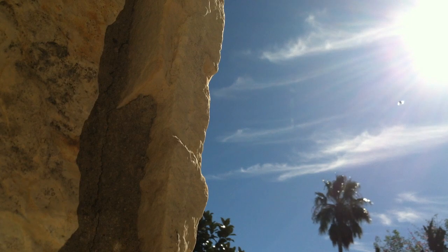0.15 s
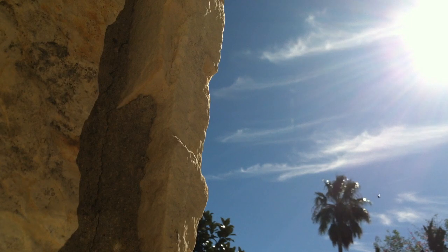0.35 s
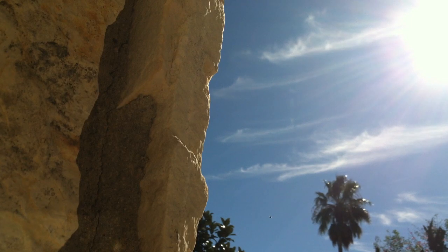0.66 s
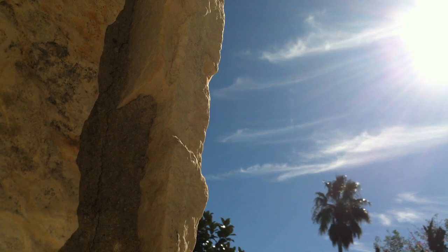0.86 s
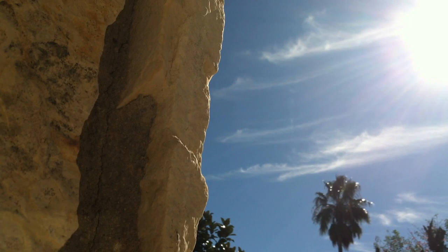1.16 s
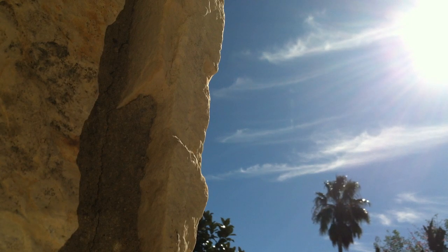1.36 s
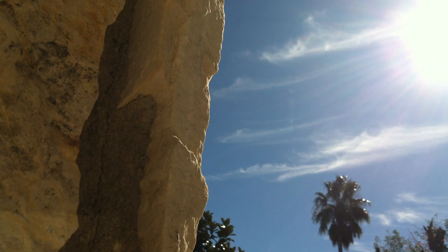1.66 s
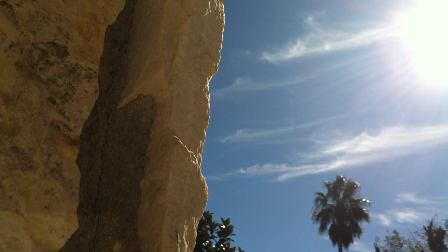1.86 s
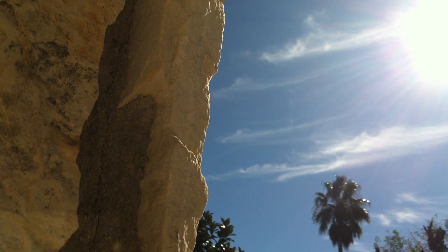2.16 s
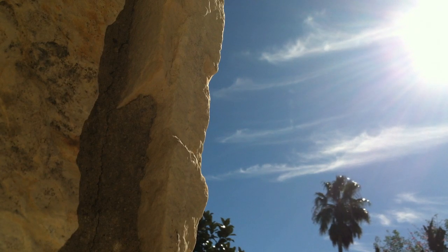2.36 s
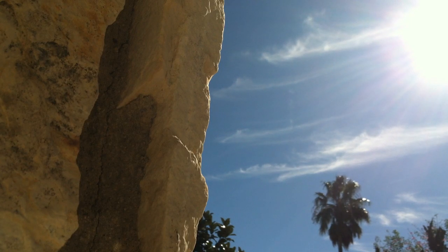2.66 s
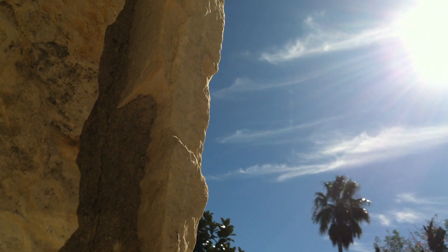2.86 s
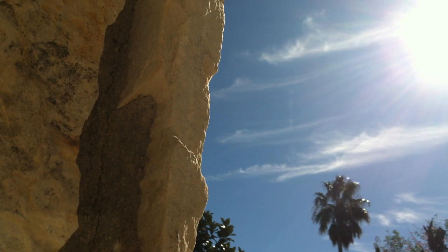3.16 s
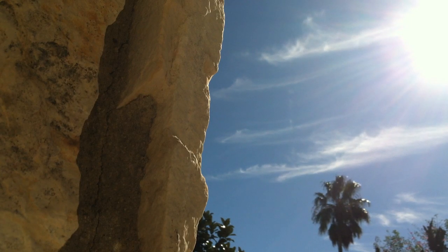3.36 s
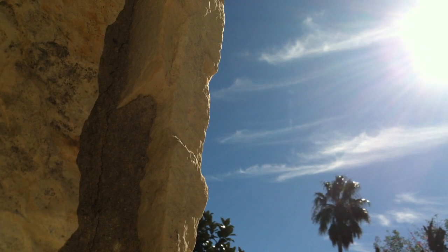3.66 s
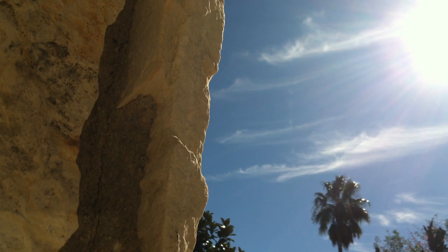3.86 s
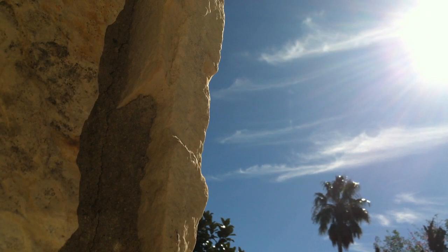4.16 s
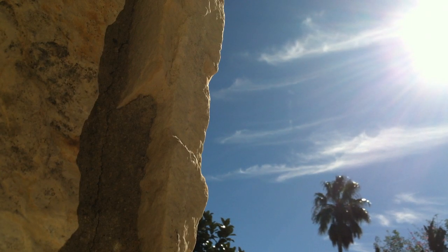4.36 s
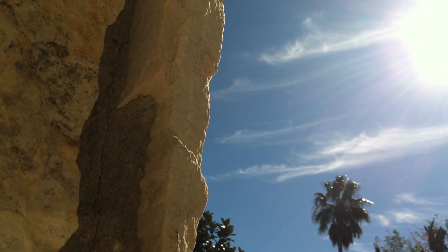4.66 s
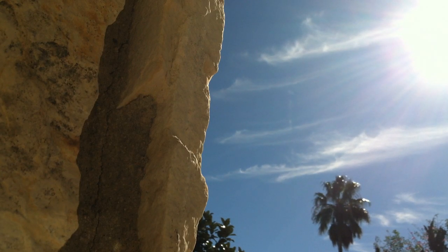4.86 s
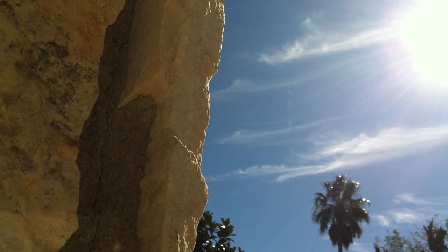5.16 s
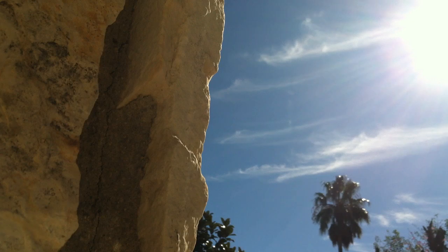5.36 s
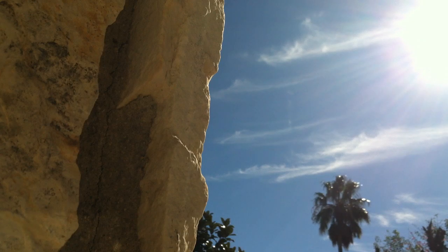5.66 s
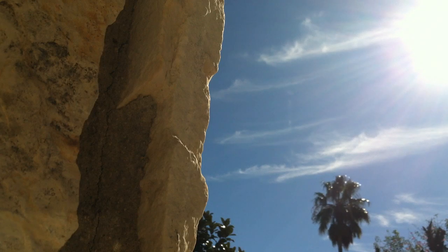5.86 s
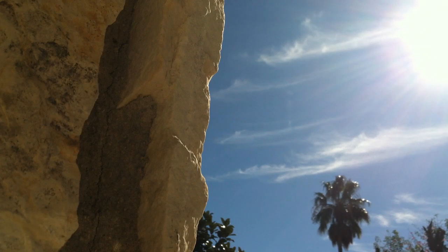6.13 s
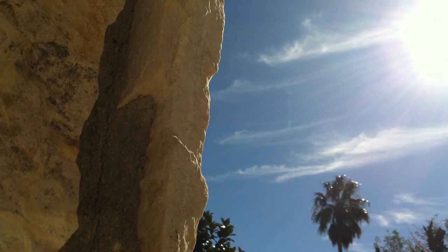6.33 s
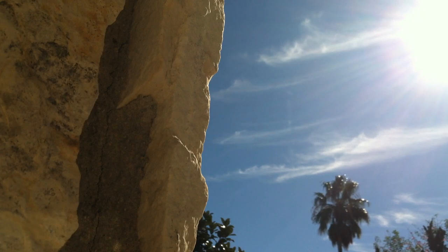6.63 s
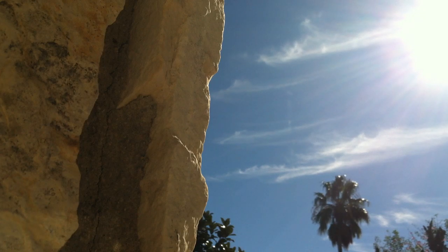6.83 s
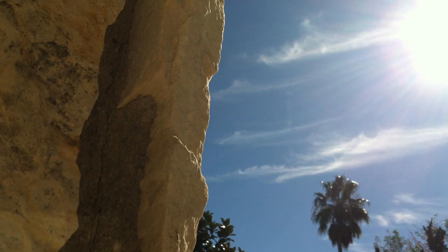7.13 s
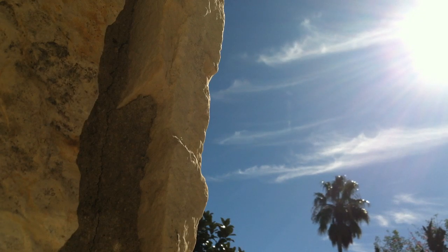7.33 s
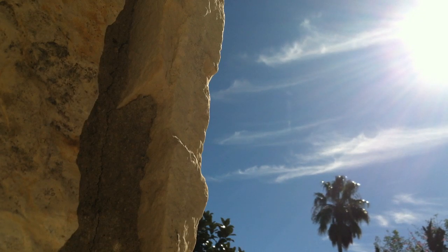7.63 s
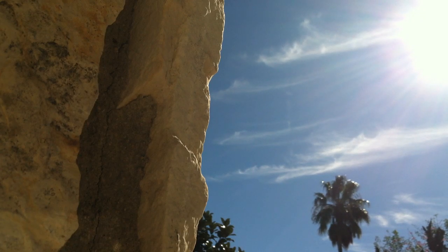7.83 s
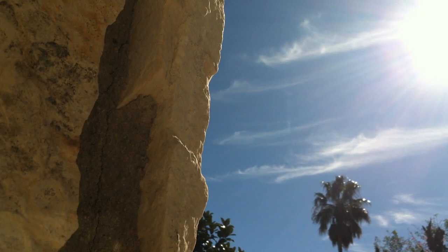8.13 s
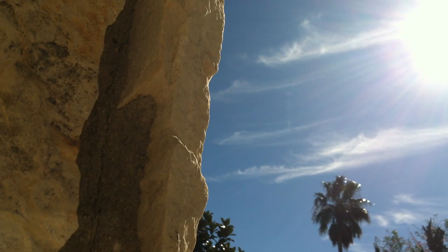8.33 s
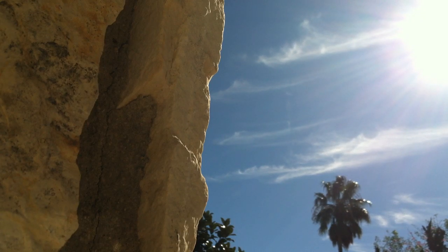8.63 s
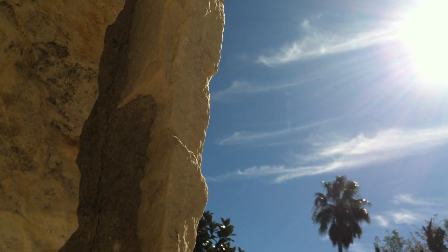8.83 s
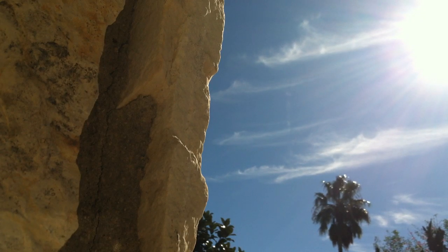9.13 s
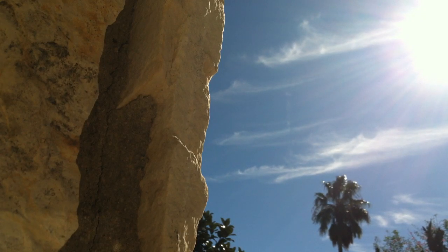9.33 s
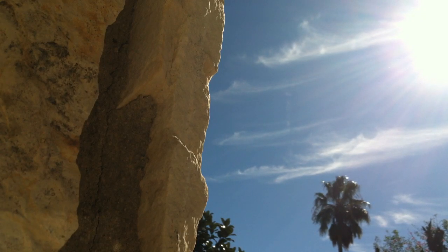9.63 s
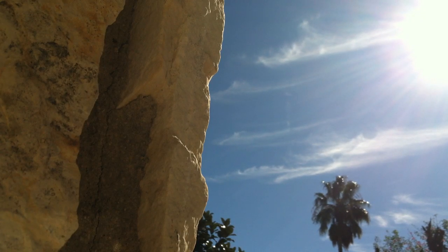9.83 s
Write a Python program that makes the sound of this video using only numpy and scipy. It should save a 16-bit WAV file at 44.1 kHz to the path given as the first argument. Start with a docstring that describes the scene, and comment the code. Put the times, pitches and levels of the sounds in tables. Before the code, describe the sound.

Steady rush of distant road traffic with low engine hum; a heavier vehicle drones past, sinking in pitch, then the roar thins.

```python
"""Distant road traffic heard from the foot of a rock wall, as swelling bands of noise over still air.
From the start a heavy vehicle drones past, a series of engine orders whose pitch sinks overall, among far engine
tones. A steady engine joins, exhausts boom as gliding tones, one swells loudly under load and a tread sings.
Later an engine drone wavers and soft rustles, fast-wandering sines, flick by; near the end one more engine
hums while a small bird chirps faintly in short sine notes with an echo."""
import sys
import numpy as np
from scipy import signal
from scipy.fft import rfft, irfft, next_fast_len
from scipy.io import wavfile
from scipy.ndimage import uniform_filter1d

SR = 44100
rng = np.random.default_rng(int(sys.argv[2]) if len(sys.argv) > 2 else 0)


def unload_wav(signal):
    """Save mono or channel-first audio to the path in sys.argv[1] as 16-bit WAV at rate SR, clipped to [-1, 1]."""
    wavfile.write(
        sys.argv[1],
        SR,
        np.round(np.clip(np.atleast_2d(signal).T, -1, 1) * 32767).astype(np.int16),
    )


N = 440559
TIME = np.arange(N) / SR  # s

# Exhaust rumble of the traffic. Each row: time in seconds, level in dB before the offset of each user.
EXHAUST_LEVEL = [(0, -37), (0.7, -35), (1.1, -33.5), (1.75, -33), (2.1, -33), (3.2, -33.5), (3.8, -33.5),
                 (4.25, -32.5), (5, -35.5), (6.4, -35.5), (6.9, -36.5), (7.75, -38.5), (8.75, -36),
                 (9.99, -39.5)]


def gain_of(db):
    """Level to amplitude: 20 dB is a factor of ten."""
    return 10 ** (np.asarray(db) / 20)


def evened(x):
    """Normalization: divides by the root mean square, so that equal gains mean equal power."""
    return x / np.sqrt(np.mean(x ** 2) + 1e-20)


def curves(rows):
    """Linear interpolation in time of every column after the first."""
    seconds, *columns = np.transpose(rows)
    return [np.interp(TIME, seconds, column) for column in columns]


def present(rows, fade=0.13):
    """Linear fades over `fade` seconds at the ends of a table; a source sounding from the start has no rise."""
    start, end = rows[0][0], rows[-1][0]
    rise = np.clip((TIME - start) / fade, 0, 1) if start > fade else 1
    return rise * np.clip((end - TIME) / fade, 0, 1)


def arch(middle, length):
    """Swell envelope: a half sine, raised to a power, that climbs from silence to 1 and sinks back."""
    phase = np.clip((TIME - middle) / length + .5, 0, 1)
    return np.sin(np.pi * phase) ** 0.79  # a power below 1 steepens the ends


def drift(rate_hz):
    """Low-passed random process: white noise under a Gaussian spectrum wanders slowly, with rms 1."""
    steps = TIME[::16]  # a coarse grid is enough for slow changes
    size = next_fast_len(len(steps))
    hz = np.fft.rfftfreq(size, steps[1])
    slow = irfft(rfft(rng.standard_normal(size)) * np.exp(-(hz / rate_hz) ** 2), size)
    return evened(np.interp(TIME, steps, slow[:len(steps)]))


def rush(spectrum, patchy_db):
    """Spectral shaping: noise of rms 1, broken into soft patches by the moving air on its way."""
    hz = np.fft.rfftfreq(4096, 1 / SR)
    real, imag, patches = rng.standard_normal((3, N // 1024 + 3, len(hz)))
    patches = uniform_filter1d(patches, size=8, axis=0)  # smooth in time
    patches = evened(uniform_filter1d(patches, size=36, axis=1))  # smooth in frequency
    corner_hz, corner_db = np.transpose(spectrum)
    colour_db = np.interp(np.log(hz + 1), np.log(corner_hz), corner_db)
    colour_db -= 40 * np.log10(np.maximum(hz / corner_hz[-1], 1))  # 12 dB per octave above the last row
    frames = (real + 1j * imag) * gain_of(colour_db + patchy_db * patches)
    return evened(signal.istft(frames.T, nperseg=4096, noverlap=3072)[1][:N])


def tone(hz, scatter, spread_hz):
    """Multipath interference: a direct sine plus randomly scattered paths that make it waver, with rms 1."""
    direct = np.exp(2j * np.pi * np.cumsum(hz) / SR)
    paths = 1 + scatter * (drift(spread_hz) + 1j * drift(spread_hz))
    return evened((direct * paths).real)


def still_air():
    """Background noise: a faint, steady broadband floor."""
    # Each row: frequency in Hz, relative density in dB per Hz.
    air_spectrum = [(30, -1.5), (3000, 4.5), (5500, 2.5), (7500, 0.5), (9000, -2), (11000, -7),
                    (14000, -13.5), (16000, -19)]
    return gain_of(-75.5) * rush(air_spectrum, patchy_db=.5)


def engine_drone():
    """Incoherent addition: many far engines and exhausts merge into low bands of noise."""
    # Deep engine noise and exhaust rumble. Each row: frequency in Hz, relative density in dB per Hz.
    deep_spectrum = [(20, -42.5), (33, -40.5), (50, -36), (65, -30.5), (82, -18.5), (100, -13.5), (120, -1),
                     (160, -0.5), (185, -7.5), (230, -28), (330, -52.5)]
    exhaust_spectrum = [(110, -52.5), (150, -13), (185, -2.5), (215, -1.5), (245, 2), (280, 0.5), (312, -3),
                        (340, -6), (400, -18), (700, -47.5)]
    # Deep engine noise. Each row: time in seconds, level in dB before a boost of 6 dB.
    deep_rows = [(0, -52), (1.6, -51), (2.8, -57), (3.8, -51), (4.5, -56), (5.1, -52), (6.5, -56),
                 (7.8, -58), (9.99, -54)]
    deep_db, = curves(deep_rows)
    exhaust_db, = curves(EXHAUST_LEVEL)
    deep = gain_of(deep_db + 6 + 1.1 * drift(2.8)) * rush(deep_spectrum, patchy_db=0.9)
    exhaust = gain_of(exhaust_db - 0.58 + 0.5 * drift(11)) * rush(exhaust_spectrum, patchy_db=-0.38)
    return deep + exhaust


def road_roar():
    """Band noise: bodies roar above the engines, tread noise centres near 900 Hz, thin treble lies on top."""
    # Body roar, tyre roar and thin treble. Each row: frequency in Hz, relative density in dB per Hz.
    body_spectrum = [(200, -39.5), (310, -3), (365, 0), (420, 1), (500, -3), (560, -4.5), (640, -8.5),
                     (780, -14.5), (1300, -48)]
    tyre_spectrum = [(400, -36), (580, -9.5), (700, -1), (840, 2.5), (1050, 1), (1280, -2), (1500, -10),
                     (2000, -24), (4000, -58)]
    treble_spectrum = [(3000, -19.5), (4000, -3.5), (4700, 1.5), (5500, -7), (7500, -13), (10000, -22.5),
                       (15000, -41)]
    # The same three. Each row: time in seconds, level in dB (before +2 dB for tyres, -3 dB for treble).
    body_rows = [(0.0, -36), (0.05, -38), (1.33, -39.5), (1.72, -34.5), (1.83, -37.5), (3.28, -36.5),
                 (6.57, -45), (6.93, -40.5), (7.18, -47.5), (7.2, -41), (7.29, -43.5), (9.99, -45.5)]
    tyre_rows = [(0.0, -44), (1.55, -42.5), (3.84, -44.5), (4.31, -43), (5.29, -46.5), (5.42, -44.5),
                 (6.34, -47), (6.37, -45), (7.48, -49.5), (8.15, -47), (9.85, -48.5), (9.99, -46)]
    treble_rows = [(0.05, -67), (1.91, -66.5), (2.9, -71), (4.36, -69.5), (7.35, -79), (9.9, -76.5)]
    body_db, tyre_db, treble_db = (curves(rows)[0] for rows in (body_rows, tyre_rows, treble_rows))
    body = gain_of(body_db) * rush(body_spectrum, patchy_db=1.0)
    tyres = gain_of(tyre_db + 2) * rush(tyre_spectrum, patchy_db=0.5)
    return body + tyres + gain_of(treble_db - 3) * rush(treble_spectrum, patchy_db=1.0)


def nearby(far_db, cars):
    """Inverse-square law: the power of each passing car falls with distance and adds to the far traffic."""
    power = gain_of(far_db) ** 2
    for closest, half, db in cars:
        power = power + gain_of(db) ** 2 / (1 + ((TIME - closest) / half) ** 2)
    return np.sqrt(power)


def tyre_hiss():
    """Air absorption: distance removes treble, so tyre hiss and sizzle follow the nearest cars."""
    # Hiss and the sizzle above it. Each row: frequency in Hz, relative density in dB per Hz.
    hiss_spectrum = [(800, -27), (1200, -6), (1450, 2), (1650, 0), (2000, -5.5), (2400, -9.5),
                     (2900, -19.5), (5000, -44.5)]
    sizzle_spectrum = [(1500, -28.5), (2200, -6), (2650, 2), (3200, -1.5), (4000, -7.5), (4700, -17.5),
                       (5400, -27.5), (7500, -38)]
    # Nearer cars. Each row: time when closest in seconds, time until half power in seconds,
    # hiss level in dB, sizzle level in dB.
    near_cars = [(0.3, 0.54, -49, -62.5), (1.2, 0.54, -46.3, -57.5), (2.0, 0.4, -60, -64),
                 (4.15, 0.68, -50, -60.5), (6.3, .4, -54, -70), (9.05, 0.48, -52, -63.5)]
    hiss_gain = nearby(-54.5, [(s, half, db) for s, half, db, _ in near_cars])
    sizzle_gain = nearby(-70.5, [(s, half, db) for s, half, _, db in near_cars])
    hiss = hiss_gain * rush(hiss_spectrum, patchy_db=1.0)
    sizzle = sizzle_gain * rush(sizzle_spectrum, patchy_db=1.6)
    return gain_of(0.18 * drift(2.7)) * (hiss + sizzle)


def passing_engine(fading_db=1.0, fading_hz=1.0):
    """Harmonic series: orders sink together; ground and wall echoes make each fade and surge on its own."""
    # Engine speed. Each row: time in seconds, cycle rate in Hz.
    speed_rows = [(0, 46.3), (0.8, 46.34), (1.2, 44.82), (2.5, 45.64), (3.8, 44.36), (4.55, 43.12),
                  (5.35, 42.77), (5.55, 41.08), (6.4, 40.48), (7.6, 39.33)]
    # Orders between surges. Each row: multiple of the cycle rate, level in dB.
    order_rows = [(2, -62), (3, -55.5), (4, -49.5), (5, -55), (6, -55.5), (7, -49.5)]
    # Surges, where echoes reinforce one order. Each row: middle in seconds, length in seconds,
    # multiple of the cycle rate, level in dB.
    surge_rows = [(0.025, 0.24, 4, -35), (0.34, 0.42, 4, -32), (0.76, 0.22, 4, -30), (0.95, 0.76, 2, -56),
                  (1.2, 0.42, 4, -38), (2.1, 0.86, 4, -38.5), (4.014, 0.6, 4, -36), (4.1, 0.8, 2, -59),
                  (4.418, 0.3, 4, -43), (4.6, 0.7, 3, -46), (5.2, 1.0, 3, -49.5), (5.3, 0.36, 4, -38),
                  (5.284, 0.38, 6, -42), (5.27, 0.56, 7, -36.5), (5.6, 0.52, 5, -37), (5.703, 0.3, 7, -35),
                  (5.748, 1.1, 2, -50.5), (5.88, 0.55, 4, -36), (5.87, 0.34, 6, -35),
                  (6.267, 0.23, 6, -37.5), (6.35, 0.69, 3, -44.5), (6.35, 0.28, 4, -43.5),
                  (6.35, 0.71, 5, -40.5), (6.524, 0.16, 7, -35.5), (6.672, 0.26, 4, -40.5),
                  (7.0, 0.5, 4, -48)]
    cycle_hz, = curves(speed_rows)
    out = np.zeros(N)
    for order, base_db in order_rows:
        surge = sum(gain_of(db) * arch(s, length) for s, length, k, db in surge_rows if k == order)
        level = np.hypot(gain_of(base_db + fading_db * drift(fading_hz)), surge)  # powers add
        out += level * tone(order * cycle_hz, scatter=0.024 * order, spread_hz=10)
    return out * present(speed_rows, fade=0.62)


def far_engines(level_db=-9, fading_db=5, count=5):
    """Frequency and amplitude modulation: a few tones wander in pitch and surface within the rumble."""
    exhaust_db, = curves(EXHAUST_LEVEL)
    out = np.zeros(N)
    for centre_hz in np.geomspace(215.7, 319.8, num=count):
        pitch = centre_hz * (1 + 0.045 * drift(.8))
        fading = gain_of(fading_db * np.tanh(drift(2.7)))  # tanh bounds the fading
        out += fading * np.sin(2 * np.pi * np.cumsum(pitch) / SR)
    return gain_of(exhaust_db + level_db) * evened(out)


def steady_engine(firing_hz=64.3, fading_db=1.5):
    """Half-order excitation: uneven cylinders add 1.5 times the firing rate to a constant hum that swells."""
    # Each row: multiple of the firing rate, middle in seconds, length in seconds, level in dB.
    swells = [(1, 3.6, 3.0, -66), (1.5, 1.85, 1.0, -54.5), (1.5, 2.9, 0.9, -53), (1.5, 4.1, 1.3, -58),
              (2, 2.5, 2.2, -50.5), (2, 3.58, 0.7, -46.5)]
    out = np.zeros(N)
    for order, middle, length, db in swells:
        hum = tone(np.full(N, order * firing_hz), scatter=0.086, spread_hz=4)
        out += gain_of(db + fading_db * drift(0.82)) * arch(middle, length) * hum
    return out


def exhaust_booms():
    """Gliding tones: a firing tone of another vehicle swells out of the rumble and sinks back."""
    # Each row: middle in seconds, length in seconds, pitch in Hz, glide in Hz per second, level in dB.
    boom_rows = [(1.752, 0.17, 254, 1.5, -32), (2.62, 0.33, 273.6, -30.5, -38.5),
                 (3.08, 0.3, 240.3, 19.5, -35), (3.379, 0.5, 192.6, -9.5, -41.5),
                 (3.6, 0.17, 236.3, -0.5, -33.5), (4.05, 0.39, 236.6, -1, -38),
                 (4.33, 0.4, 311.6, 0, -38.5), (4.605, 0.6, 263, -9.5, -38), (8.947, 0.77, 254.3, 0, -46),
                 (9.08, 0.65, 181, 0, -46)]
    out = np.zeros(N)
    for middle, length, hz, glide, db in boom_rows:
        pitch = hz + glide * np.clip(TIME - middle, -length, length)
        out += gain_of(db) * arch(middle, length) * tone(pitch, scatter=.13, spread_hz=12)
    return out


def throttled_engine(rows, scatter, spread_hz):
    """Firing frequency: one tone follows the throttle, and its scattered paths make it waver."""
    hz, db = curves(rows)
    return gain_of(db) * present(rows) * tone(hz, scatter, spread_hz)


def lone_engines():
    """Tonal prominence: three engines that enter in turn stand out of the rumble as single tones."""
    # The loudest exhaust, swelling twice under load; a far engine whose drone wavers;
    # a late vehicle easing off and picking up again.
    # Each row: time in seconds, firing tone in Hz, level in dB.
    loud_rows = [(3.1, 279, -43), (3.52, 277, -39), (3.6, 278, -30), (3.74, 279, -38), (3.9, 279.5, -35),
                 (3.97, 279.7, -27.5), (4.03, 280, -27), (4.12, 277, -33.5), (4.33, 278, -39.5)]
    wavering_rows = [(6.85, 226, -45), (7.1, 231, -43), (7.45, 231, -39), (7.7, 229, -49),
                     (8.0, 231.7, -38.5), (8.45, 232.9, -38.5), (8.8, 231.7, -44.5), (9.4, 234.4, -46),
                     (9.7, 236, -50)]
    late_rows = [(8.58, 216, -52), (8.75, 214, -37), (8.95, 211, -36), (9.1, 207.5, -35.5),
                 (9.21, 208, -38.5), (9.32, 211.5, -37.5), (9.5, 210, -52), (9.8, 214, -38),
                 (9.99, 216, -44)]
    return (throttled_engine(loud_rows, scatter=.1, spread_hz=12)
            + throttled_engine(wavering_rows, scatter=.33, spread_hz=14)
            + throttled_engine(late_rows, scatter=.14, spread_hz=12))


def tread(fading_db=2):
    """Narrow-band noise: coarse tread blocks sing a fuzzy, broken note, half buried in the roar."""
    # Each row: time in seconds, pitch in Hz, level in dB.
    tread_rows = [(3.3, 751, -55), (3.8, 770, -49.5), (4.4, 788.4, -49.5), (4.8, 810, -50),
                  (5.2, 841, -53.5), (5.48, 851, -48.5), (5.8, 850, -58)]
    hz, db = curves(tread_rows)
    note = tone(hz, scatter=3, spread_hz=70)  # scattered paths outweigh the direct sine
    return gain_of(db + fading_db * drift(5)) * present(tread_rows) * note


def rustles(level_db=-1):
    """Random frequency modulation: fast wandering turns short high sines into thin, raspy flicks."""
    # Each row: start in seconds, centre in Hz, length in seconds, level in dB before level_db.
    flicks = [(7.245, 7800, .025, -78), (7.61, 7600, .07, -81), (7.67, 6900, .12, -78),
              (9.519, 6700, .05, -76), (9.615, 6900, .05, -76), (9.86, 6700, .05, -75),
              (9.945, 7500, 0.078, -74)]
    out = np.zeros(N)
    rasp_hz = drift(900) * 520
    for start, hz, length, db in flicks:
        rasp = np.sin(2 * np.pi * np.cumsum(hz + rasp_hz) / SR)
        out += gain_of(db + level_db) * arch(start + length / 2, length) * rasp
    return out


def bird(echo_t60=0.25, echo_db=-5):
    """Exponential decay: short, high, quavering notes leave a brief echo off the rock (t60 in seconds)."""
    # Each row: start in seconds, pitch in Hz, length in seconds, level in dB.
    chirps = [(9.33, 5950, 0.03, -77), (9.619, 7870, 0.022, -77)]
    quaver = np.cumsum(drift(600) * 110) / SR  # in cycles, from a deviation of 110 Hz rms
    notes = np.zeros(N)
    for start, hz, length, db in chirps:
        note = np.sin(2 * np.pi * (hz * TIME + quaver))
        notes += gain_of(db) * arch(start + length / 2, length) * note
    decay = np.exp(-np.log(1000) * TIME[:SR // 2] / echo_t60)
    tail = rng.standard_normal(SR // 2) * decay
    echo = signal.oaconvolve(notes, tail / np.linalg.norm(tail))[:N]
    return notes + gain_of(echo_db) * echo


def scene():
    """Superposition: the pressures of all sources add at one microphone."""
    traffic = engine_drone() + road_roar() + tyre_hiss()
    engines = passing_engine() + far_engines() + steady_engine() + exhaust_booms() + lone_engines()
    return (still_air() + traffic + engines + tread() + rustles() + bird())[None]


def record(dry):
    """Band limitation: soft ends, then the recorder's linear-phase low-pass."""
    ends = signal.windows.tukey(N, .0003)
    low_pass = signal.firwin(511, 15700, window=("kaiser", 9), fs=SR)  # edge in Hz
    return signal.oaconvolve(dry * ends, low_pass[None], "same")


dry = scene()
out = record(dry)
unload_wav(out)
```